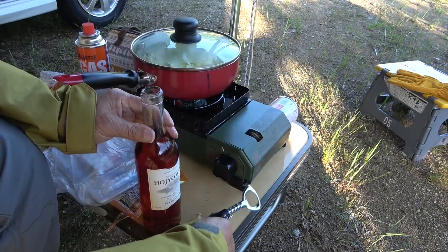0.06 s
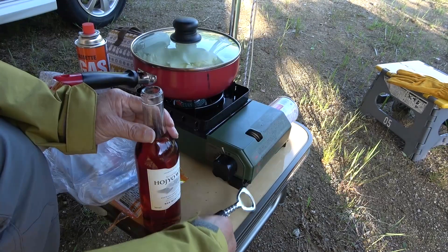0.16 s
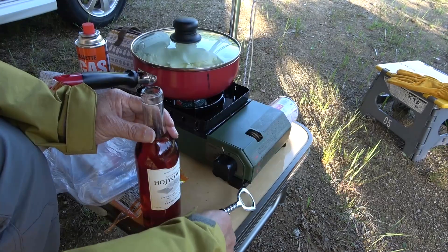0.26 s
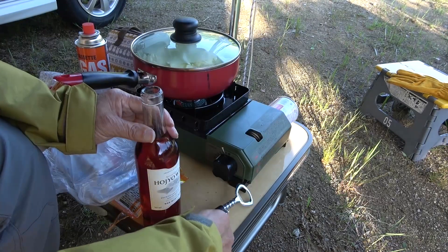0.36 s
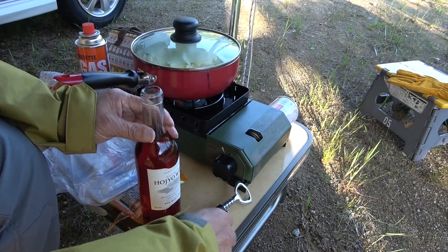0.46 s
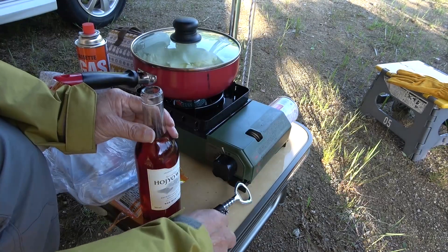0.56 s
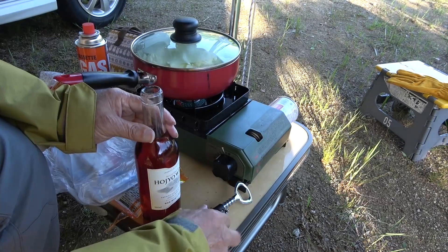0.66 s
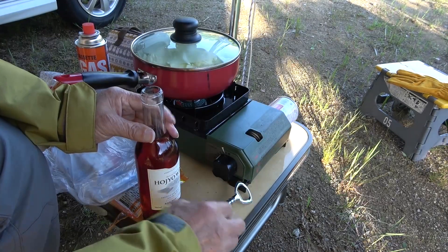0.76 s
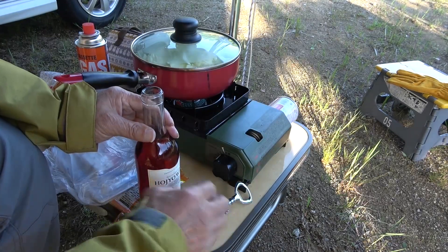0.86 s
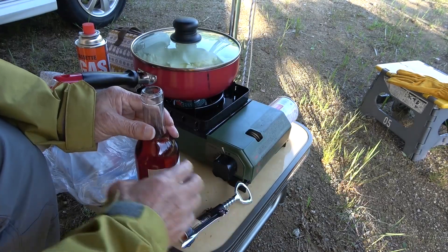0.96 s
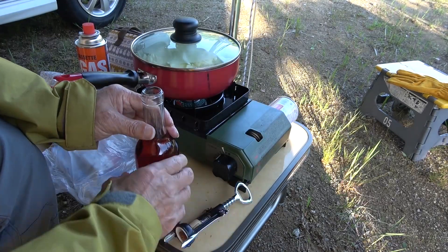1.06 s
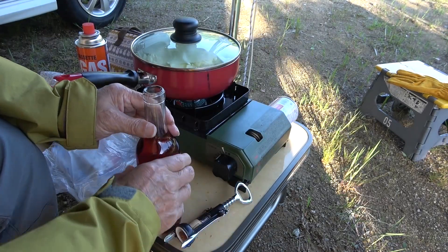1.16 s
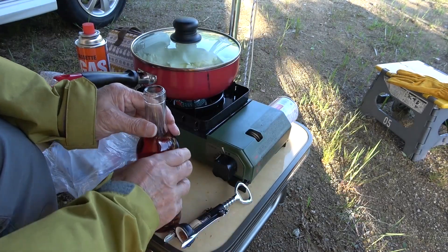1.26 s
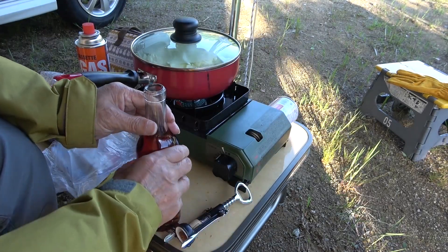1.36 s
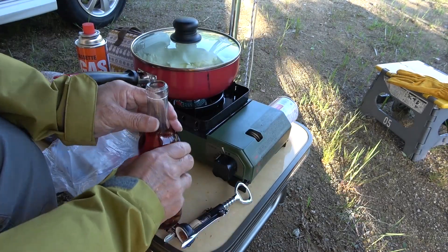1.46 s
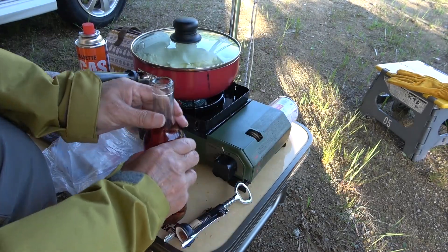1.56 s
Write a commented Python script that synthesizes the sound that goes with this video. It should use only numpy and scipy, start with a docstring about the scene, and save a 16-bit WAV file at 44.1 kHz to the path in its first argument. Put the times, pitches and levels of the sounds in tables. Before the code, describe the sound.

Metal corkscrew knocks, clatters and scrapes briefly onto a hard folding table outdoors, then quiet hand touches

```python
"""Under everything lies the low rush of a campsite: coloured noise that swells and flutters slightly.
A winged corkscrew is laid on a folding camp table: it touches, lands, slides a little and tips over.
Its contacts are decaying sines (knock, clack, brief ring, table thump) and noise bursts (tick, rattle).
The slide is rough coloured noise; dull bumps of the hand on the table are low, soft-starting sines.
Late on, a faint far whistle wavers and a hand taps (sines) and brushes (noise) the wine bottle."""
import sys
import numpy as np
from scipy import signal
from scipy.fft import rfft, irfft
from scipy.io import wavfile
from scipy.ndimage import uniform_filter1d

SR = 44100
rng = np.random.default_rng(int(sys.argv[2]) if len(sys.argv) > 2 else 0)


def wav_out(sig):
    """Save sig, one row per channel (or a flat mono array), as 16-bit PCM at SR to the path in sys.argv[1]."""
    wavfile.write(sys.argv[1], SR, np.round(np.clip(np.atleast_2d(sig).T, -1, 1) * 32767).astype(np.int16))


N = 70560
T = np.arange(N) / SR  # seconds
BIN_HZ = np.arange(N // 2 + 1) * SR / N
LEFT_RIGHT = np.array([[.5], [-.5]])  # shares a level difference between the two ears


def undb(db):
    """Decibels to gain."""
    return 10 ** (np.asarray(db) / 20)


def curve(points):
    """Read a table of frequency_hz, level_db at every frequency bin, along a log frequency axis."""
    hz, db = np.array(points, float).T
    return np.interp(np.log(BIN_HZ + 1), np.log(hz), db)


def colour(x, db):
    """Filter by a gain in dB per bin."""
    return irfft(rfft(x) * undb(db), N)


def noise(spectrum, width):
    """Stereo noise: a shared part of rms 1, plus a side part of opposite sign in the two ears."""
    middle = colour(rng.standard_normal(N), curve(spectrum))
    side = colour(rng.standard_normal(N), curve(spectrum) + curve(width))
    return (middle + np.array([[1], [-1]]) * side) / middle.std()


def lean(x, points):
    """Place a sound by a left-minus-right level difference per frequency."""
    return colour(x, LEFT_RIGHT * curve(points))


def highpass(x, hz):
    """Second-order low cut."""
    return signal.sosfilt(signal.butter(2, hz, "high", fs=SR, output="sos"), x)


def fade(start_s, rise_s, t60_s):
    """Quick rise and exponential decay; t60 is the time to lose 60 dB."""
    age = np.maximum(T - start_s, 0)
    return (1 - np.exp(-age / rise_s)) * np.exp(-np.log(1000) * age / t60_s)


def mode(start_s, hz, rise_s, t60_s):
    """One struck resonance: a sine that rises quickly and dies away."""
    return fade(start_s, rise_s, t60_s) * np.sin(2 * np.pi * hz * (T - start_s))


def swell(points):
    """Gain from start_s, level_db points, silent up to the first."""
    s, db = np.array(points, float).T
    return undb(np.interp(T, s, db)) * (T > s[0])


def walk(rate_hz):
    """Smooth random wander with a spread of 1: held random steps, averaged over one step."""
    step = max(int(SR / rate_hz), 2)
    held = np.repeat(rng.standard_normal(N // step + 1), step)
    x = uniform_filter1d(held, step)[:N]
    return x / x.std()


# Spectrum of the background: frequency_hz [Hz], relative_level_db [dB]
AIR_SPECTRUM = [(30, -15.5), (62, -8.5), (100, -8), (170, -2), (215, -5), (280, -.5), (370, 0), (430, -5),
                (490, -3.5), (600, -13), (850, -14), (1250, -18.5), (1700, -23.5), (2400, -22.5),
                (4000, -26), (6200, -27.5), (10500, -33), (14400, -37), (15200, -48)]
# Side part of the background against its shared part: frequency_hz [Hz], side_level_db [dB]
AIR_WIDTH = [(100, -39), (3000, -24), (7500, -5.5), (9500, -5), (11000, -13)]
# Lean of the background to the left: frequency_hz [Hz], left_minus_right_db [dB]
AIR_LEAN = [(60, .5), (110, 2.5), (200, 6), (380, 5), (700, 3), (1300, 3.5), (2400, 4), (4400, 7),
            (8000, 2.5), (13000, 0)]
# Thin high bands in the hiss: centre_hz [Hz], width_hz [Hz], level_above_hiss_db [dB]
HISS_BANDS = [(8260, 130, 8), (9380, 130, 4), (11520, 150, 4), (12650, 150, 5.5)]
# Slow swells of the low rush: time_s [s], gain_db [dB]
RUSH_SWELLS = [(0, -4), (.3, 1.5), (.6, -0.5), (.8, -1.5), (1.22, -.5), (1.31, 2), (1.38, -1), (1.6, 0.5)]
AIR_DB, FLUTTER_DB, FLUTTER_HZ = -44.5, 1.13, 17.42


def campsite():
    """Coloured noise whose low part swells and flutters slightly, with a few thin bands in its faint hiss."""
    bands_db = sum(db * np.exp(-((BIN_HZ - hz) / width) ** 2) for hz, width, db in HISS_BANDS)
    air = colour(noise(AIR_SPECTRUM, AIR_WIDTH), bands_db)
    low = signal.sosfilt(signal.butter(1, 700, fs=SR, output="sos"), air)
    rush_db = np.interp(T, *np.array(RUSH_SWELLS).T) + FLUTTER_DB * walk(FLUTTER_HZ)
    moving = air + low * (undb(rush_db) - 1)  # only the low part changes level
    return lean(moving, AIR_LEAN) * undb(AIR_DB)


# Contacts of corkscrew and table; levels are relative within each layer:
# start_s [s], knock_hz [Hz], knock_db [dB], knock_t60_s [s], clack_db [dB], tick_db [dB],
# ring_db [dB], rattle_db [dB], thump_db [dB], treble_tilt_db [dB per octave]
CONTACTS = [(0.0604, 1200, -27, .014, -39, -35.5, -60, -51, -71, -2),
            (0.1137, 1080, -18, 0.036, -50, -22.5, -46, -33, -49, -4),
            (0.208, 1145, 7.5, 0.018, 0.5, -11.5, -25.5, -20, -33, 3),
            (0.2128, 1024, 3, 0.011, -9, -2, -14, -17, -25, 3),
            (0.3494, 1250, -27, 0.018, -12.5, -21, -56, -34.5, -34, 7),
            (0.4044, 1103, -5.5, .014, 0.5, -11, -24.5, -24, -26, -8.5),
            (0.4545, 1128, 5, .012, -32, -15.5, -28, -40, -32.5, -1),
            (0.4624, 1102, -16.5, 0.036, -13, -26.5, -29, -34, -34, -24),
            (0.567, 1172, -26, 0.029, -49, -34.5, -56, -59, -44, -6),
            (0.6929, 1166, -34.5, 0.06, -56, -54, -41.5, -50, -57, -17)]
# Resonances of the handle: frequency_hz [Hz], relative_level_db [dB], t60_s [s]
CLACK_MODES = [(1850, -15, 0.032), (2042, 2.5, .013), (2170, -18.5, 0.14), (2350, -8, 0.028),
               (2904, -10, 0.032), (3200, -25, .012)]
# Resonances of corkscrew and table: frequency_hz [Hz], relative_level_db [dB]
RING_MODES = [(510, -10), (888, -3), (1030, 3), (1303, -2), (1667, -2), (1895, -1), (2232, -5), (2457, 2),
              (2702, -2), (2870, -2), (2954, -2), (3093, -5), (4083, -4), (4492, -9), (4840, -10),
              (6083, -10)]
# Low modes of the table top: frequency_hz [Hz], relative_level_db [dB], t60_s [s]
TABLE_MODES = [(119, -10.5, 0.164), (193.6, -4, 0.2), (236.2, -6.5, 0.19), (268.8, 2, 0.17),
               (395, -14.5, 0.24)]
# Spectrum of the tick: frequency_hz [Hz], relative_level_db [dB]
TICK_SPECTRUM = [(100, -47), (600, -29), (1500, -2), (3000, 8.5), (4800, -3.5), (6200, 1.5), (8500, -9.5),
                 (11000, -12.5), (15500, -24)]
# Spectrum of the loose wings shaking: frequency_hz [Hz], relative_level_db [dB]
RATTLE_SPECTRUM = [(40, -46), (120, -16.5), (480, -4.5), (720, -10), (1100, -1.5), (1480, -5.5),
                   (2000, -5.5), (2900, -2.5), (3600, -7), (4300, -7), (5200, -16), (6100, -15.5),
                   (7300, -20), (8400, -13.5), (10500, -25), (15000, -33)]
# Side part of tick, rattle, scrape and brush against the shared part: frequency_hz [Hz], side_level_db [dB]
NOISE_WIDTH = [(300, -24), (2500, -28), (4500, -19), (6300, -14), (9000, -5.5), (11000, -24)]
KNOCK_RISE_S, HARD_RISE_S, TICK_T60_S = 0.0024, 0.00045, 0.02  # the hard rise serves clack, tick and taps
RATTLE_LAG_S, RATTLE_RISE_S, RATTLE_T60_S = 0.0027, 0.0027, 0.11  # the ring shares this rise
RING_T60_S, RING_SHORTEN = 0.12, 0.47  # t60 at 1 kHz; higher modes die sooner by this power of frequency
RING_SCATTER = .001  # random spread of each mode's pitch, as a share of it
TABLE_LAG_S, TABLE_RISE_S = .005, 0.0056
RADIATE_HZ = 664  # the small parts radiate little below this
TILT_FROM_HZ = 7300  # the treble tilt of tick and rattle starts here


def ring_modes(start_s):
    """Brief metallic ring: many modes of alternating sign, shifted slightly from contact to contact."""
    shift = 1 + RING_SCATTER * rng.standard_normal(len(RING_MODES))
    ring = 0
    for k, (hz, db) in enumerate(RING_MODES):
        t60_s = RING_T60_S * (hz / 1000) ** -RING_SHORTEN
        ring = ring + (-1) ** k * undb(db) * mode(start_s, hz * shift[k], RATTLE_RISE_S, t60_s)
    return ring / 2


def table_thump(start_s):
    """The table top answers a little late with its low modes, in alternating sign."""
    return sum((-1) ** k * undb(db) * mode(start_s + TABLE_LAG_S, hz, TABLE_RISE_S, t60_s)
               for k, (hz, db, t60_s) in enumerate(TABLE_MODES))


def corkscrew():
    """Each contact knocks the panel, clacks the handle, shakes the loose wings and sets the table top going."""
    out = np.zeros((2, N))
    tick_noise = noise(TICK_SPECTRUM, NOISE_WIDTH)
    rattle_noise = noise(RATTLE_SPECTRUM, NOISE_WIDTH)
    octaves = np.log2(np.maximum(BIN_HZ / TILT_FROM_HZ, 1))
    for (start_s, knock_hz, knock_db, knock_t60_s, clack_db, tick_db,
         ring_db, rattle_db, thump_db, tilt_db) in CONTACTS:
        knock = mode(start_s, knock_hz, KNOCK_RISE_S, knock_t60_s)
        clack = sum(undb(db) * mode(start_s, hz, HARD_RISE_S, t60_s) for hz, db, t60_s in CLACK_MODES) / 2
        blow = highpass(undb(knock_db) * knock + undb(clack_db) * clack, RADIATE_HZ)
        tick = tick_noise * fade(start_s, HARD_RISE_S, TICK_T60_S) / 2
        rattle = rattle_noise * fade(start_s + RATTLE_LAG_S, RATTLE_RISE_S, RATTLE_T60_S)
        metal = undb(tick_db) * tick + undb(rattle_db) * rattle
        out += undb(ring_db) * ring_modes(start_s) + undb(thump_db) * table_thump(start_s)
        out -= blow  # opposite sign to ring and thump
        out += colour(metal, tilt_db * octaves)
    return highpass(out, 80)


# Spectrum of the scrape, with a hump near the knock pitch: frequency_hz [Hz], relative_level_db [dB]
SCRAPE_SPECTRUM = [(60, -26), (200, 4), (500, -11.5), (750, -21), (950, -3.5), (1080, 9.5), (1250, 5),
                   (1450, -9), (2100, -4.5), (2900, -7), (4200, -24), (9000, -31.5), (15000, -56)]
# Level of the slide: time_s [s], level_db [dB]
SLIDE_LEVEL = [(0.14, -85), (0.19, -45), (0.25, -56), (0.29, -38.5), (0.322, -36), (0.342, -33.5),
               (0.372, -46), (0.395, -38.5), (0.5, -47), (0.55, -52), (0.62, -79), (0.69, -51.5),
               (0.74, -68)]


def slide(rough_db=.8, rough_hz=300):
    """The handle drags lightly over the table top: coloured noise with a slightly rough level."""
    return noise(SCRAPE_SPECTRUM, NOISE_WIDTH) * swell(SLIDE_LEVEL) * undb(rough_db * walk(rough_hz))


# Soft bumps on the table: start_s [s], pitch_hz [Hz], relative_level_db [dB]
BUMPS = [(0.461, 136, -34), (0.489, 197, -17), (0.876, 205, -31.5)]


def bumps(rise_s=0.0032, t60_s=0.058):
    """Dull bumps of the hand on the table: low modes whose rise is applied twice for a cushioned start."""
    out = np.zeros(N)
    for start_s, hz, db in BUMPS:
        cushion = 1 - np.exp(-np.maximum(T - start_s, 0) / rise_s)
        out += undb(db) * mode(start_s, hz, rise_s, t60_s) * cushion
    return out


# Path of the faint whistle: time_s [s], pitch_hz [Hz], level_db [dB]
WHISTLE = [(1.12, 6050, -82), (1.16, 5900, -67), (1.23, 5720, -64), (1.27, 5900, -73), (1.33, 5900, -65),
           (1.38, 5830, -73), (1.46, 6200, -78)]


def whistle(waver=0.0073, waver_hz=110):
    """A thin whistle far away, perhaps a bird: one gliding sine with a random waver in pitch."""
    s, hz, db = np.array(WHISTLE).T
    pitch_hz = np.interp(T, s, hz) * (1 + waver * walk(waver_hz))
    gain = np.interp(T, s, undb(db), left=0, right=0)
    return gain * np.sin(2 * np.pi * np.cumsum(pitch_hz) / SR)


# Taps of the fingers on the bottle: start_s [s], pitch_hz [Hz], relative_level_db [dB]
TAPS = [(1.271, 2470, -39), (1.584, 4300, -31), (1.5883, 2500, -18.5), (1.5888, 4900, -24.5),
        (1.5946, 4350, -25)]
# Spectrum of the brushing: frequency_hz [Hz], relative_level_db [dB]
BRUSH_SPECTRUM = [(400, -18), (1200, 3), (2600, 0), (4500, -1), (6500, -2.5), (9000, -11), (15000, -20)]
# Level of the brushing, before panning: time_s [s], level_db [dB]
BRUSH_LEVEL = [(1.48, -63), (1.525, -54.5), (1.55, -46.5), (1.6, -43.5)]


def hand(rough_db=2, rough_hz=300, tap_t60_s=0.0075, pan_db=6):
    """A hand taps the bottle (very short modes) and brushes it (rough noise), both to the left."""
    taps = sum(undb(db) * mode(start_s, hz, HARD_RISE_S, tap_t60_s) for start_s, hz, db in TAPS)
    brush = noise(BRUSH_SPECTRUM, NOISE_WIDTH) * swell(BRUSH_LEVEL) * undb(rough_db * walk(rough_hz))
    return (brush + taps) * undb(LEFT_RIGHT * pan_db)


# Lean of corkscrew and table to the left: frequency_hz [Hz], left_minus_right_db [dB]
TABLE_LEAN = [(100, 0.5), (250, 3.5), (1200, 2), (2400, 0.5), (4400, 4), (8000, -0.5)]


def scene():
    """Corkscrew and table just left of centre, the hand further left, the campsite around."""
    on_table = lean(corkscrew() + slide() + bumps(), TABLE_LEAN)
    return campsite() + on_table + whistle() + hand()


def record(dry, top_hz=15600):
    """Clip at full scale, then cut the top steeply."""
    return signal.sosfilt(signal.ellip(8, .2, 80, top_hz, fs=SR, output="sos"), np.clip(dry, -1, 1))


dry = scene()
out = record(dry)
wav_out(out)
```